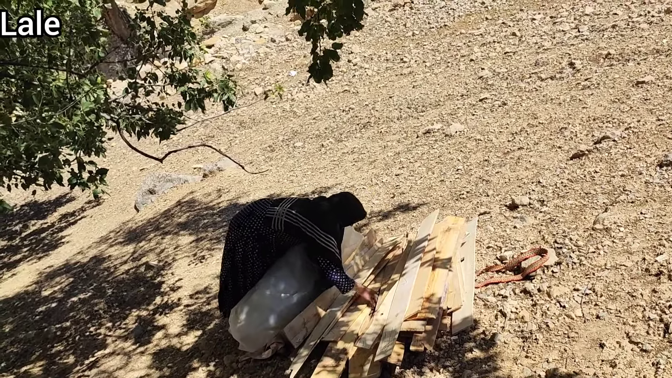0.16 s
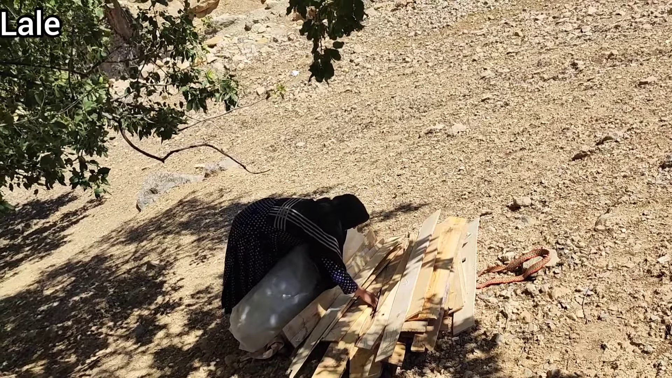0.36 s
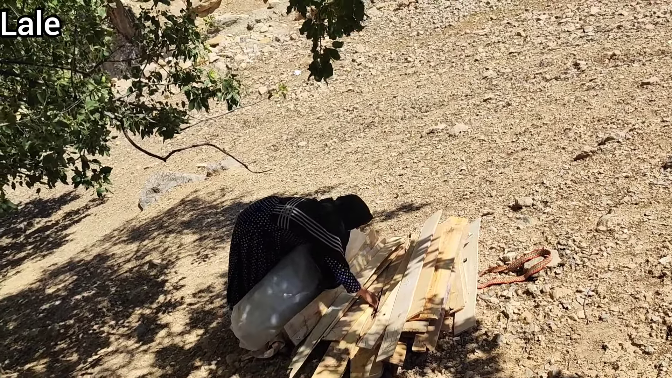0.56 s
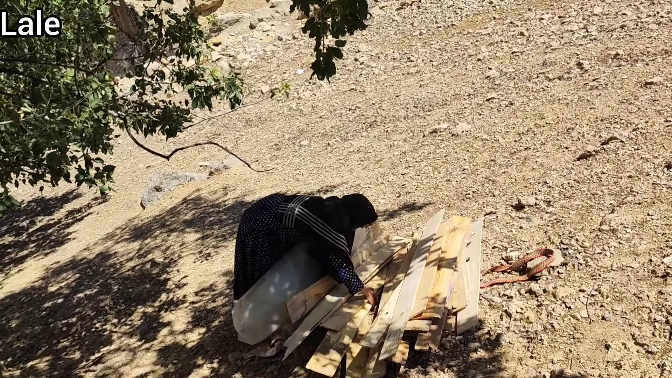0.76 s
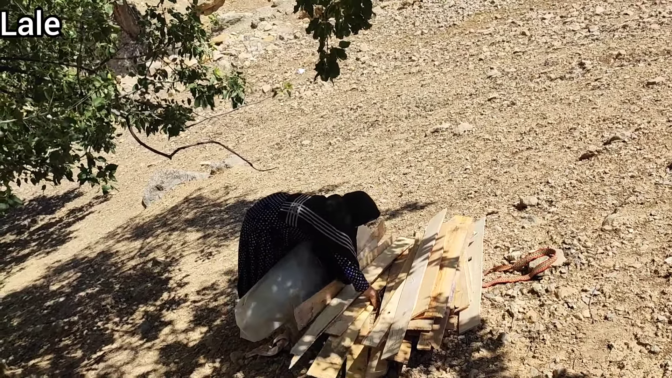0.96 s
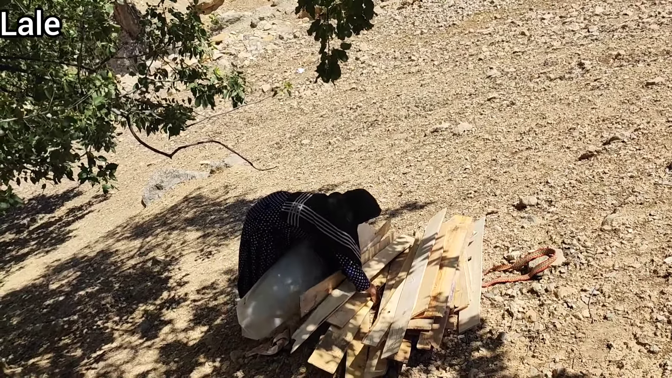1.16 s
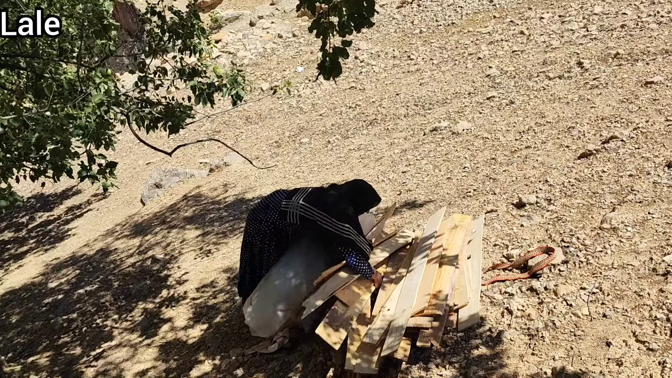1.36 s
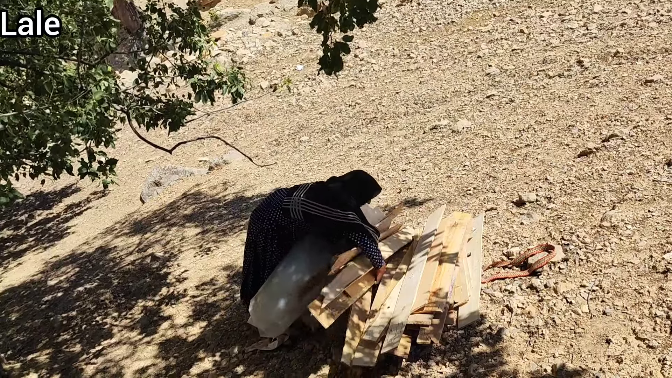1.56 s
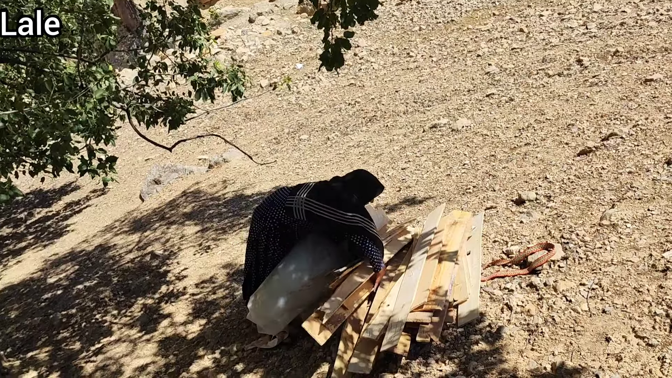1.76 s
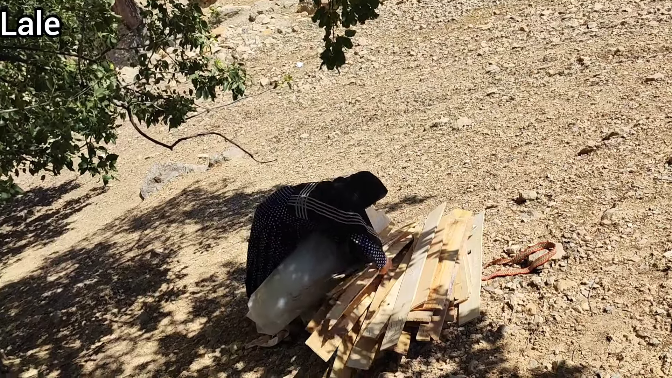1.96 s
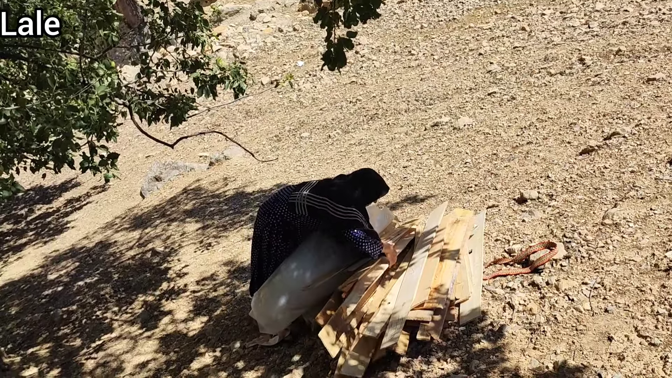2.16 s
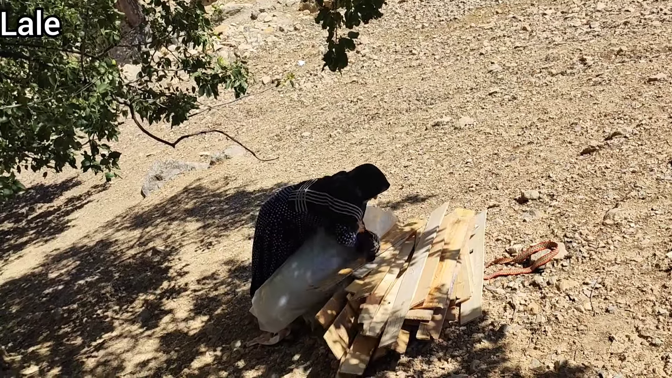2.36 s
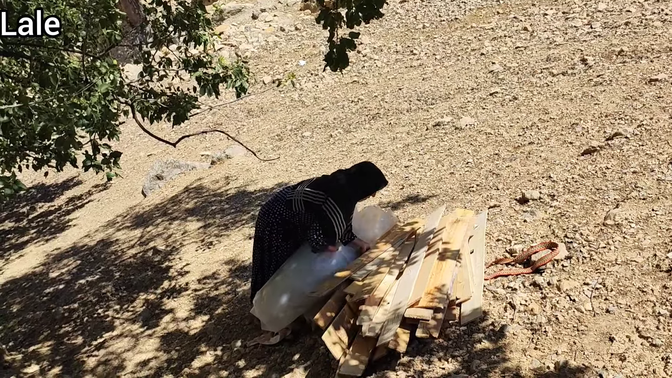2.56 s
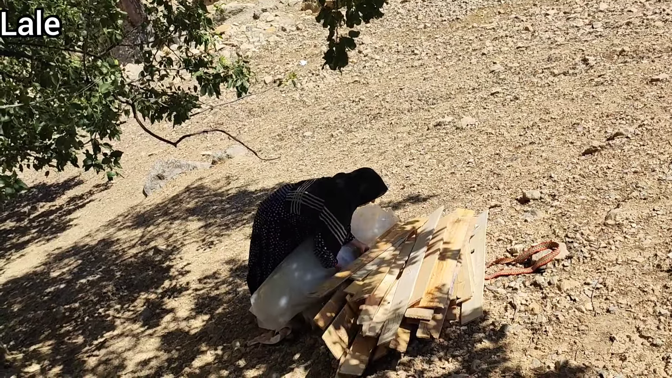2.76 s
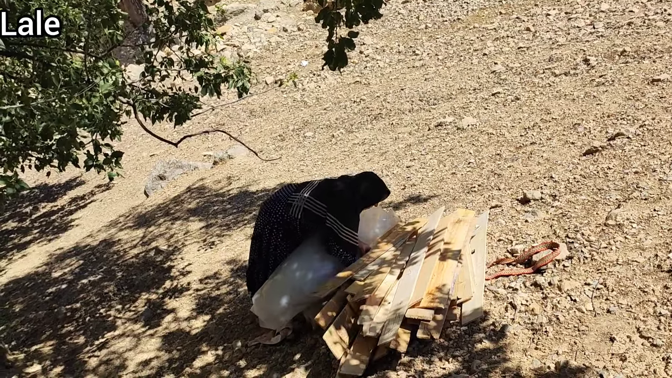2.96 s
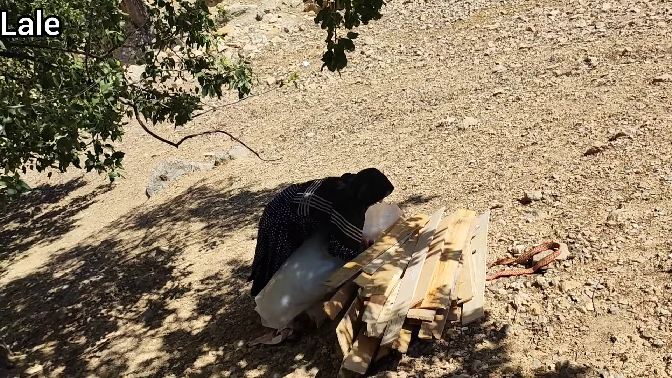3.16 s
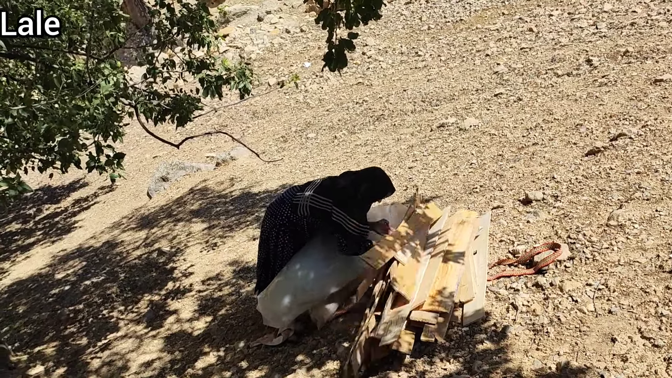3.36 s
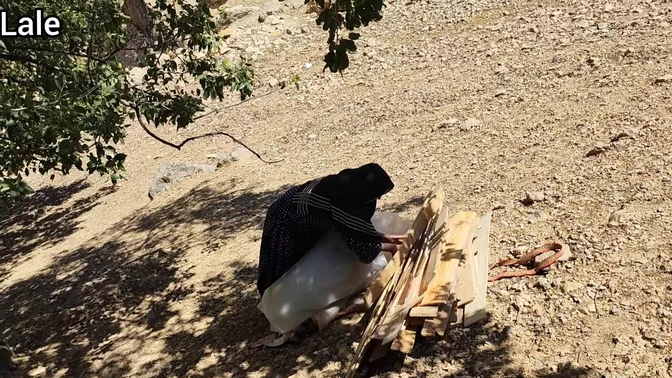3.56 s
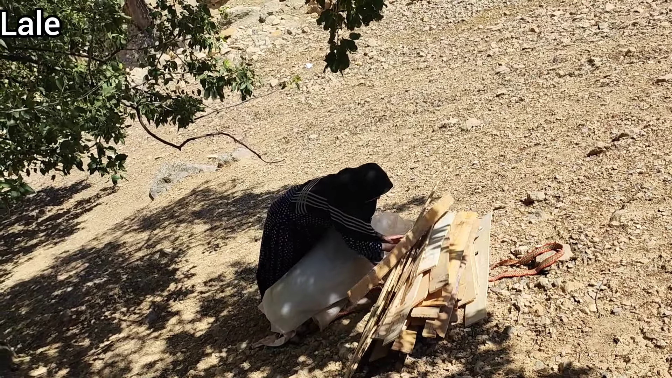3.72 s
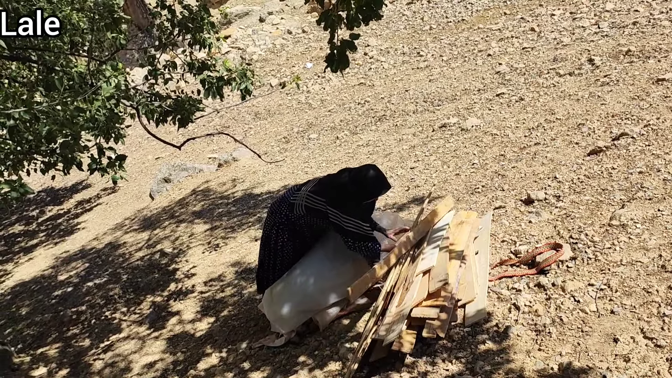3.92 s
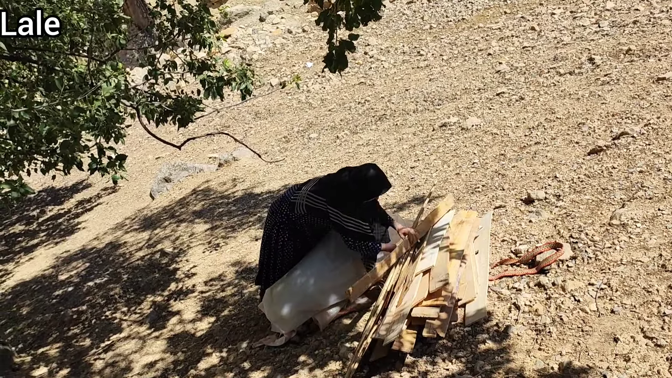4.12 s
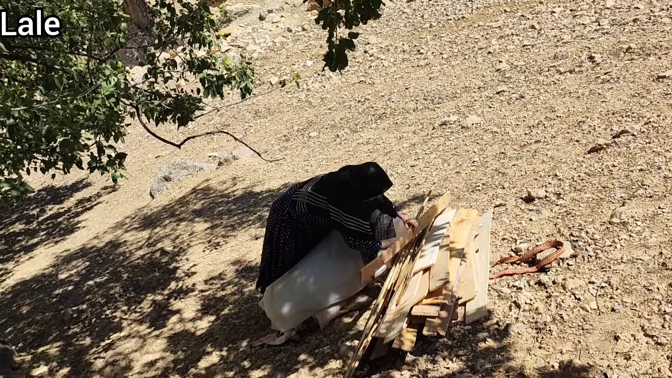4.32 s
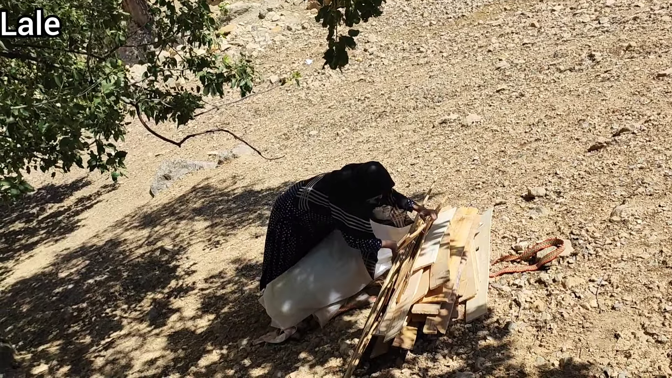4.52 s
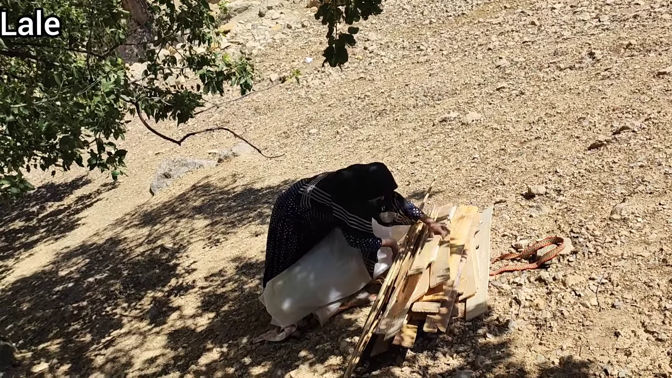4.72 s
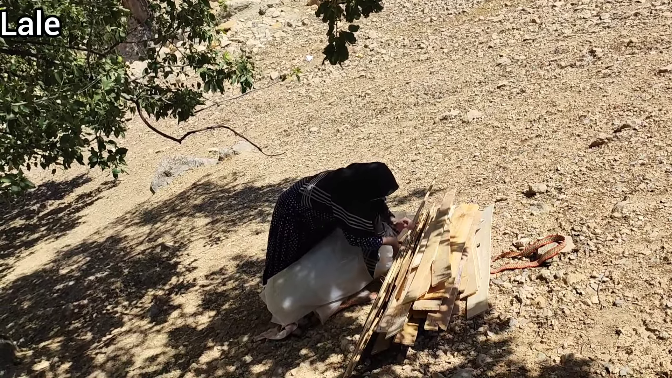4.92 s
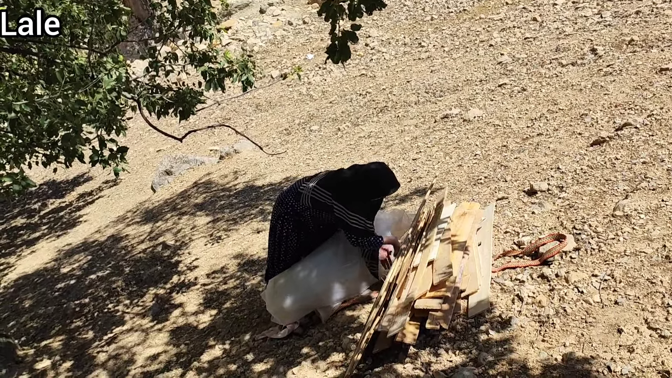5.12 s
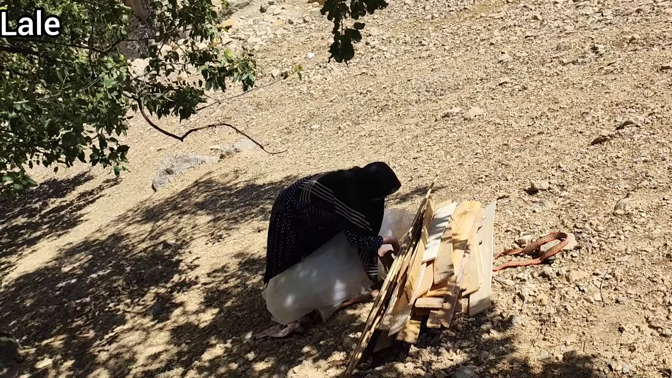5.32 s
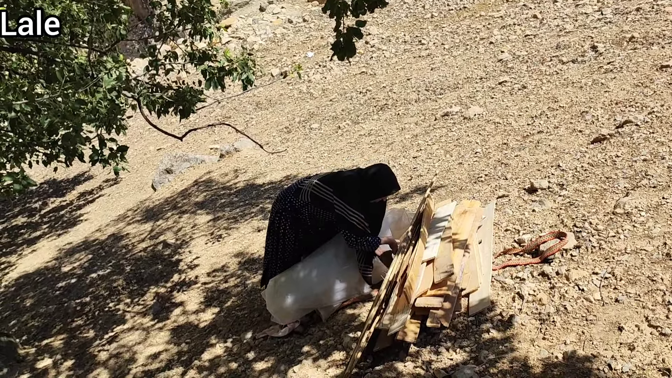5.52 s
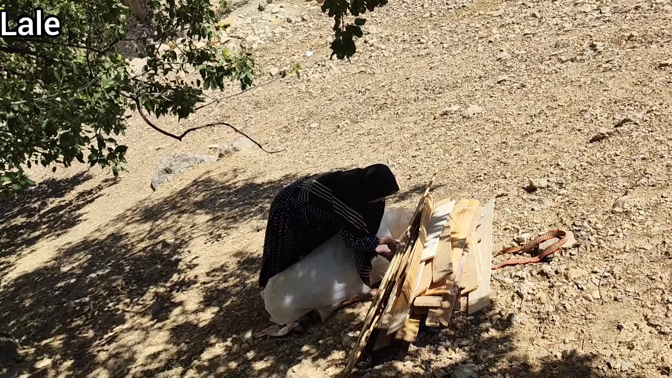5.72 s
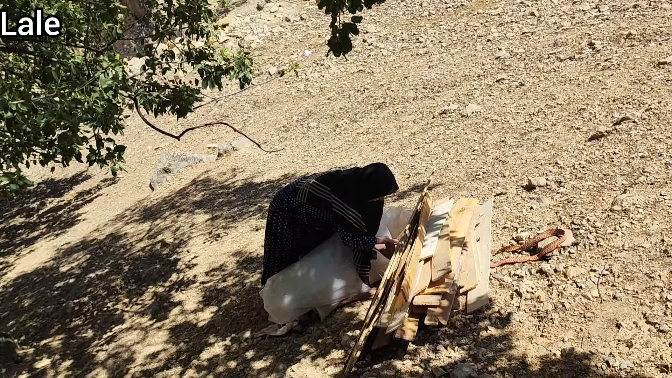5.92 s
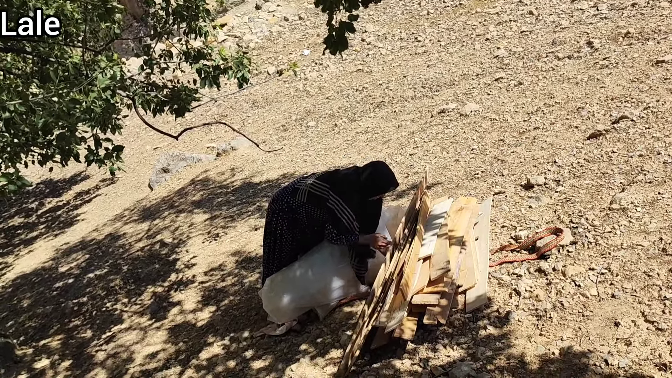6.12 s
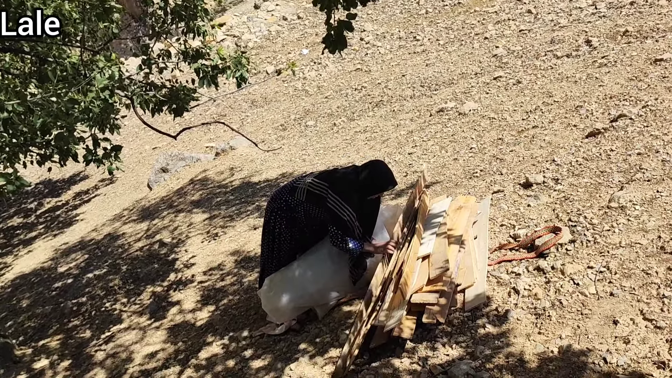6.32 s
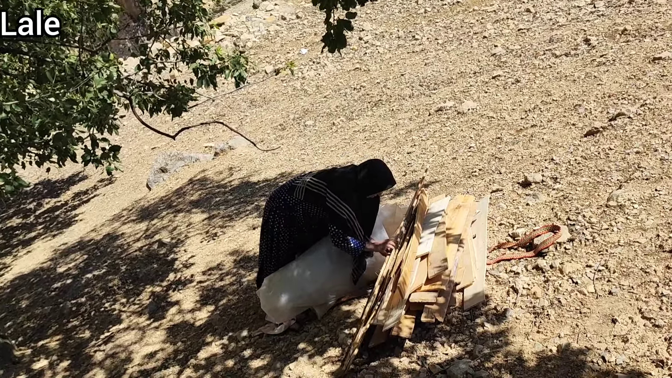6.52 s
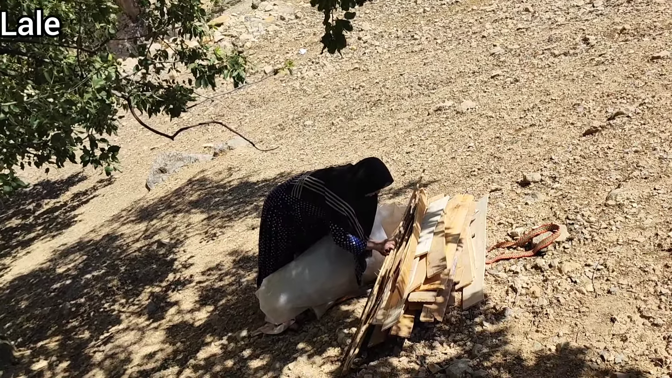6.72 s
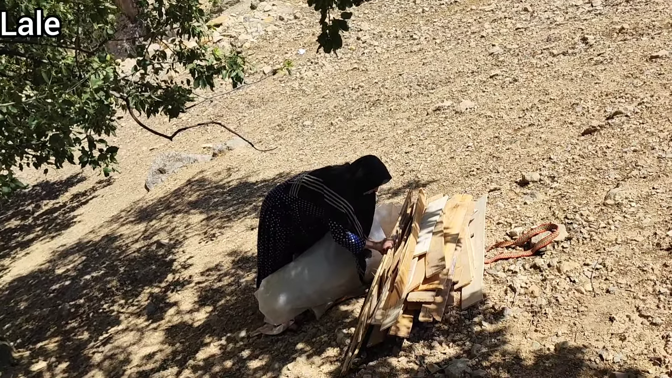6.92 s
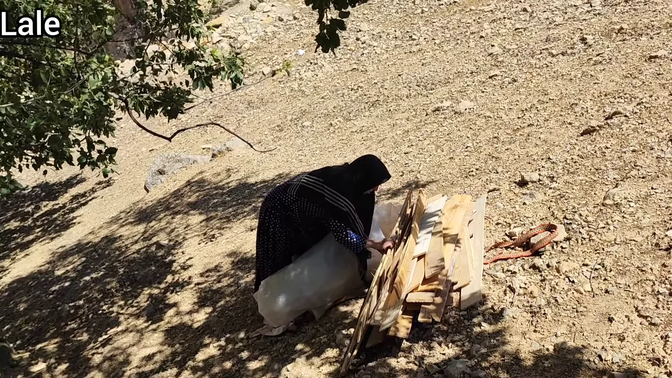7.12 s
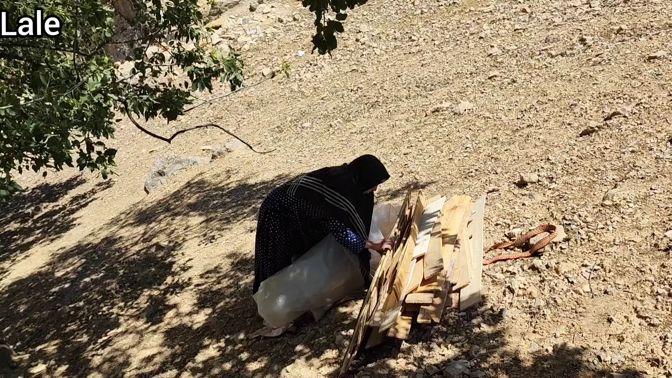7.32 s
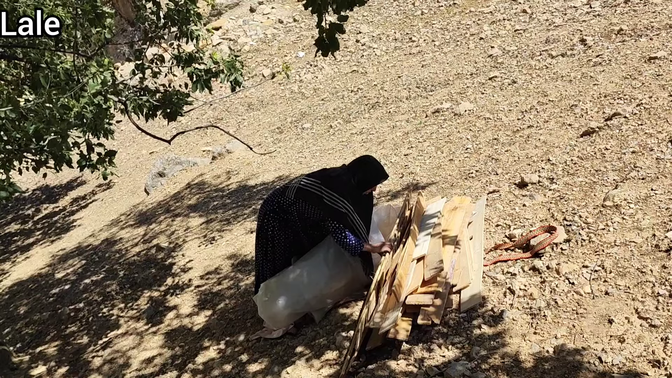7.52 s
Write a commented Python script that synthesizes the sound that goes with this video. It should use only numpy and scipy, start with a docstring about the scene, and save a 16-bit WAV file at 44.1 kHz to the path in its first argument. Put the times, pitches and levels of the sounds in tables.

```python
"""Thin wooden boards are turned over and stacked on dry ground, a few metres away in the open air.
Each impact excites the damped modes of the pile, with a crack and a short rattle; stick-slip friction
drives the same modes as the boards slide. A woven sack rustles, and splinters and strips snap.
Turbulent wind buffets the two microphone ports, chiefly the left, over a faint hush and a few high chirps.
"""
import sys
import numpy as np
from scipy import signal
from scipy.fft import rfft, irfft
from scipy.io import wavfile

SR = 44100
rng = np.random.default_rng(int(sys.argv[2]) if len(sys.argv) > 2 else 0)


def transcribe(u):
    """Save the signal u as a 16-bit wav file named by the first command-line argument.

    u: samples, shape (n,) or (channels, n), limited to [-1, 1]; the rate is SR.
    q: integer samples, one column per channel.
    """
    v = np.clip(np.atleast_2d(u).T, -1, 1)
    q = np.round(v * 32767).astype(np.int16)
    wavfile.write(sys.argv[1], SR, q)


N = 334278
TIME, FREQS = np.arange(N) / SR, np.fft.rfftfreq(N, 1 / SR)

# impacts: t/s, level/dB, f/Hz of the struck board, relative level/dB of low modes, crack, middle modes
KNOCKS = [(0.008, -30.5, 1155, -17, -26, -10), (0.083, -27.5, 963, -19, -14, -10),
          (0.129, -31, 1920, -4, -15, -5), (0.162, -33, 1785, -18, -10, -23),
          (0.246, -38, 1560, -6, -17, -11), (0.697, -41.5, 1057, -5, -19, -14),
          (0.767, -31, 1090, -17, -32, -24), (0.822, -42, 1800, 1, -3, -18),
          (0.894, -32.5, 1340, -6, -33, -10), (0.994, -45, 2460, -3, 4, -10),
          (1.012, -21.5, 1110, -9.5, -15.5, -3.5), (1.077, -32.5, 1037, -6, -8.5, -3),
          (1.14, -34.5, 1230, -10, -17, 2), (1.235, -37.5, 913, -25, -9, -25),
          (1.306, -34, 1000, -11, -15, -22), (1.438, -14, 1353, -15.5, -27, -10),
          (1.511, -34.5, 900, -2, -29, -5), (1.565, -31.5, 1037, -8, -10, -11),
          (1.603, -28.5, 986, -15, -20, -4), (1.621, -26.5, 830, -3, -18, 0),
          (1.668, -29, 1016, -32, -23, 1), (1.683, -24.5, 847, -5, -22, -9),
          (1.777, -25.5, 1274, 1.5, -27, 9), (1.83, -29.5, 2050, -13, -16, -25),
          (1.894, -32, 937, -26, -12, -18), (1.991, -25.5, 739, -11, -24, -5),
          (2.009, -29, 1260, -6, -15, -19), (2.064, -33, 2070, 3, -17, -12),
          (2.096, -29.5, 1210, -14, -23, -21), (2.192, -33.5, 1260, -1.5, -22, -17),
          (2.246, -33.5, 1037, -19, -20, -23), (2.321, -36.5, 990, -15.5, -10.5, -20),
          (2.343, -30, 1100, -3.5, -17, -26), (2.357, -18.5, 2307, -41, -30.5, -10),
          (2.368, -18, 1375, -8, -21.5, -15), (2.398, -16, 1400, -32, -17.5, -20),
          (2.432, -16, 1347, -33, -15, -11.5), (2.445, -40.5, 1040, -27, -14.5, -20),
          (2.474, -28, 1410, -16, -26.5, -19), (2.502, -20, 1243, -11, -18.5, -8.5),
          (2.606, -34, 1540, -16, -8.5, -23), (2.644, -34.5, 2330, -29, -5.5, -17),
          (2.67, -38, 1740, -28, -4, -24), (2.709, -37, 1390, -9, -8, -14),
          (3.144, -43, 2190, -26, -14, -17), (3.159, -37, 2325, -30, -14, -31),
          (3.182, -34.5, 1127, -30, -6.5, -27), (3.317, -46.5, 1390, 8, -1, -15),
          (3.363, -31, 1080, -10, -12, -14.5), (3.38, -29.5, 1920, -12, -18, -20.5),
          (3.43, -25, 656, -7, -21, -8), (3.458, -22.5, 1200, -17.5, -20, -12.5),
          (3.482, -21.5, 900, -18, -18.5, -12.5), (3.494, -10, 1700, -30.5, -14.5, -18),
          (3.515, -16, 1217, -29.5, -18, -21.5), (3.549, -18, 1240, -16.5, -26.5, -12.5),
          (3.57, -18.5, 993, -23.5, -16, -19.5), (3.589, -17, 2030, -10.5, -12.5, -20),
          (3.607, -7.5, 1355, -33.5, -14.5, -27.5), (3.62, -20.5, 900, -32, -5.5, -17),
          (3.697, -21, 960, -23, -17, -21), (3.735, -15, 1950, -29, -27.5, -12.5),
          (3.748, -16, 743, -23, -12, -14.5), (3.761, -17, 964, -23.5, -13, -22),
          (3.818, -32, 792, -30, -32, -25), (3.887, -51.5, 655, -37, -22.5, -11),
          (3.964, -36, 734, -10, -9, -11), (4.081, -32.5, 1760, -2, -35, 16),
          (4.089, -31, 1038, -29, -41, -16), (4.129, -40, 695, -2, -27, -2),
          (4.166, -47, 1300, -23, -15, -22), (4.7, -38.5, 1222, -30, -15, -20),
          (4.831, -38, 890, -25, -21.5, -18), (4.899, -37.5, 910, -8, -13.5, -15),
          (4.931, -26, 980, -34.5, -15, -28), (4.934, -22.5, 1894, -28, -17, -20),
          (4.959, -24, 978, -27, -22, -12), (4.983, -29, 1130, -20, -18, 0),
          (5.053, -43.5, 2530, -24, -0.5, -18), (5.134, -33.5, 2600, -29, -7.5, -23),
          (5.367, -38.5, 2740, -24, -8.5, -6), (5.472, -45.5, 1500, -25, -28, -24),
          (5.869, -52.5, 560, 9, -21.5, -13), (6.668, -53, 500, 11, -20, -9),
          (6.829, -49, 1850, -27, -10, -20), (7.008, -52.5, 1015, -25, -2, -17),
          (7.361, -42, 326, 11, -35, -10)]
# modes of the pile: f/Hz, level/dB, T60/s before contact damping
PILE_MODES = [(160, 7.5, 0.035), (215.6, 5.5, 0.17), (272, 4, 0.084), (312, 1.5, 0.11), (353, 1.5, 0.26),
              (415, 1, 0.085), (477, -2, 0.15), (560, -3, 0.18), (606, -3.5, 0.22), (694, 1.5, 0.13),
              (791, 0.5, 0.1), (817, -0.5, .16), (910, -5, 0.19), (992, -3.5, 0.15), (1030, -3.5, 0.31),
              (1080, -5.5, .15), (1196, -1.5, 0.12), (1303, -0.5, .15), (1370, 3, 0.05), (1500, 0, 0.062),
              (1589, -10.5, 0.057), (1725, 3, 0.071), (1830, 1, .12), (1950, -0.5, .11), (2110, -1, .11),
              (2190, -1.5, 0.17), (2277, -5, 0.3), (2440, 1.5, 0.079), (2460, -9.5, 0.15)]
LOW_MODE_HZ, MID_MODE_HZ = 450, 800  # upper limits of the low and middle modes
# spectrum of an impact's crack: f/Hz, relative level/dB
CRACK_SPECTRUM = [(1590, -14), (2700, 2.5), (5860, -9.5), (7160, -36.5), (8950, -27), (9940, -40.5),
                  (15000, -38), (16000, -42)]
# steady handling between impacts: t/s, sliding level/dB, rustle level/dB
EFFORT = [(0, -59, -54.5), (.2, -40.5, -55), (.35, -56.5, -60.5), (.55, -82, -81), (.75, -46, -50.5),
          (.95, -47, -58), (1.18, -62, -59), (1.39, -40, -49.5), (1.44, -73, -54), (1.64, -33.5, -48.5),
          (1.74, -47, -55.5), (1.95, -40, -48), (2.3, -45.5, -56.5), (2.6, -44.5, -56), (2.84, -60.5, -58),
          (2.96, -80, -77), (3.19, -50, -51), (3.36, -40.5, -46), (3.6, -26.5, -40.5), (3.8, -37, -52),
          (3.99, -53, -55), (4.05, -70.5, -66.5), (4.68, -83, -77), (4.95, -55, -57.5), (5.25, -60, -56),
          (5.5, -60, -66), (5.56, -74, -72.5), (6.45, -72, -83), (7.58, -71, -73.5)]
# a hand shifts the load: t/s, hold/s, sliding level/dB, rustle level/dB
SHOVES = [(0, 0.0074, -33.5, -51.5), (0.093, 0.015, -30, -49.5), (0.253, .01, -44, -58),
          (0.582, 0.017, -63, -66), (0.861, 0.045, -47, -54.5), (1.024, 0.032, -41, -49),
          (1.149, 0.015, -42.5, -55), (1.62, .02, -37, -48), (1.787, .02, -48, -60),
          (1.98, 0.019, -42, -51), (2.091, 0.0087, -38, -63), (2.239, 0.033, -45.5, -50.5),
          (2.466, 0.023, -45, -49), (2.62, 0.022, -59, -49), (3.196, .02, -48, -62),
          (3.372, 0.0067, -28.5, -36.5), (4.085, 0.017, -66, -59), (4.163, 0.013, -73, -56),
          (4.37, 0.018, -56, -68), (4.488, 0.033, -61, -66.5), (4.705, 0.08, -64, -64),
          (4.835, 0.011, -43, -56.5), (4.898, 0.034, -34.5, -54), (5.169, 0.021, -51, -51.5),
          (5.38, 0.04, -51.5, -60), (5.519, 0.0044, -70, -61.5), (5.574, 0.0086, -70, -65),
          (5.646, 0.023, -65.5, -70), (5.777, .005, -61.5, -62.5), (6.008, .005, -71, -87),
          (6.1, .01, -68.5, -67), (6.195, 0.035, -75, -69.5), (6.252, 0.013, -68, -66.5),
          (6.494, .01, -73, -73.5), (6.555, 0.0082, -66, -64), (6.662, .01, -61.5, -68),
          (6.776, 0.053, -76, -63.5), (6.863, 0.0089, -81, -64.5), (6.943, 0.0089, -67, -62),
          (7.021, 0.017, -70, -65), (7.149, .01, -62, -66.5), (7.374, .01, -79, -77),
          (7.557, .02, -68, -77)]
# spectrum of the sack's rustle as coloured by the microphone: f/Hz, relative level/dB
SACK_SPECTRUM = [(180, -28), (300, -6.5), (1360, -3), (1610, -8), (2500, -2), (2800, -9), (4900, -4.5),
                 (6500, -9), (7200, -18), (8700, -15.5), (9500, -18.5), (10000, -24), (15000, -29),
                 (16000, -36.5)]
# spectrum of eddies at the ports: f/Hz, relative level/dB
WIND_SPECTRUM = [(20, 1), (35, -4.5), (70, -7), (110, -8.5), (200, -27.5), (400, -55.5)]
# gusts: t/s, hold/s, level/dB
GUSTS = [(.3, .08, -58), (1.18, 0.16, -56), (1.48, 0.31, -52.5), (1.98, 0.19, -38.5), (2.24, 0.048, -39),
         (2.45, 0.076, -53), (2.87, 0.025, -51.5), (3.01, 0.012, -44.5), (3.14, 0.025, -51),
         (3.58, .02, -52.5), (4.89, .05, -63), (5.86, 0.012, -61), (6.2, 0.026, -58), (6.52, .03, -54.5),
         (6.674, .01, -55), (6.715, .03, -57), (6.81, .01, -49), (7.25, 0.024, -54)]
# spectrum of the open-air background: f/Hz, relative level/dB
HUSH_SPECTRUM = [(59, -44), (100, -17.5), (160, -3.5), (189, -12.5), (481, -23), (535, -18.5), (854, -16),
                 (1280, -24), (1830, -24), (2080, -27.5), (16000, -31.5)]
# splinters and strips breaking: t/s, level/dB, centre f/Hz
SNAPS = [(0.9994, -48, 4000), (1.147, -45, 4550), (1.1927, -33, 4200), (1.5449, -46, 3810),
         (1.952, -33.5, 5030), (2.17, -33, 4400), (2.422, -42.5, 3397), (2.614, -35, 3810),
         (2.795, -35, 3500), (3.3762, -31, 4020), (3.5748, -41, 5040), (3.7219, -37, 3830),
         (5.023, -44, 4800), (7.2554, -40.5, 2390)]
# faint high chirps: t/s, duration/s, start f/Hz, end f/Hz, level/dB
CHIRPS = [(4.672, 0.062, 8500, 8300, -75), (5.628, 0.065, 8600, 8300, -71), (5.779, 0.11, 8480, 8170, -71),
          (5.946, 0.067, 8300, 8000, -74)]
# likeness of the sound at the two ports: f/Hz, coherence (0 to 1)
COHERENCE = [(60, .96), (300, .985), (800, .975), (1300, .82), (2500, .7), (4000, .4), (6500, .1),
             (16000, .0)]
# shadowing of the ports: f/Hz, left minus right level/dB
PORT_BALANCE = [(60, -1), (110, -3), (200, -1), (380, 2), (700, 1), (1290, 2), (2380, -1), (4400, -9.5),
                (8120, -7.5), (15000, 3)]
# lead of the left port over the right: f/Hz, phase/rad
PORT_PHASE = [(300, 0), (1210, .25), (1460, .3), (1720, -1), (1980, -1.1), (2580, .5), (3700, -.5),
              (5400, 2), (16000, 2)]


def undb(db):
    """Amplitude ratio corresponding to a level in dB."""
    return 10 ** (np.asarray(db) / 20)


def along(table, hz):
    """Interpolation of a (frequency, value) table on a logarithmic frequency axis."""
    at, value = np.transpose(table)
    return np.interp(np.log(np.maximum(hz, 1)), np.log(at), value)


def unit(x):
    """Normalisation to unit RMS amplitude."""
    return x / np.sqrt(np.mean(x ** 2))


def pair(mid, side, hz):
    """Partial coherence: left and right are the weighted sum and difference of independent signals."""
    alike = along(COHERENCE, hz)
    return np.array([np.sqrt(1 + alike) * mid + sign * np.sqrt(1 - alike) * side for sign in (1, -1)])


def coloured(spectrum, gate=1.):
    """Source and filter: stereo noise is gated before it is coloured, so each grain rings out."""
    mid, side = rfft(gate * rng.standard_normal((2, N)))
    return irfft(pair(mid, side, FREQS) * undb(along(spectrum, FREQS)), N)


def decay(x, ms):
    """Exponential relaxation: each impulse dies away with the given time constant."""
    return signal.lfilter([1], [1, -np.exp(-1000 / (ms * SR))], x)


def grains(per_second, spread_db, length_ms):
    """Shot noise: the envelope of random decaying contacts, most small and a few large."""
    hits = (rng.random(N) < per_second / SR) * undb(spread_db * rng.exponential(size=N))
    return unit(decay(hits, length_ms))


def highpass(x, hz):
    """Third-order bass roll-off: little sounds below the given frequency."""
    return signal.sosfilt(signal.butter(3, hz, "high", fs=SR, output="sos"), x)


def swells(start, hold, db, rise_db_s, fall_db_s, bed_db):
    """Incoherent addition: the level in dB of events that rise, hold and fall over a bed."""
    t = TIME[::64]
    drop_db = np.maximum(rise_db_s * (start[:, None] - t), fall_db_s * (t - (start + hold)[:, None]))
    power = np.sum(undb(db[:, None] - np.maximum(drop_db, 0)) ** 2, axis=0)
    return 10 * np.log10(np.interp(TIME, t, power) + undb(bed_db) ** 2)


def board_knocks(focus_oct=.72, scatter_db=3, detune=.018, damping_db_s=600, contact_ms=.35,
                 touch_db=-20, bounce_db=-7, fade_db=-10, rattle_ms=21):
    """Impact excitation: a light touch, the hit and its rebounds ring the pile's modes and crack."""
    out, crack = np.zeros((2, N + SR)), np.zeros(N + SR)
    hz, db, t60 = np.transpose(PILE_MODES)
    t = np.arange(SR // 8) / SR
    contact = np.hanning(int(contact_ms * SR / 1000) + 3)  # wood on wood yields a little
    lead = SR // 500  # samples from first touch to hit
    mode_draws = rng.standard_normal((len(KNOCKS), 4, len(hz)))
    bounce_draws = rng.random((len(KNOCKS), 2, 14))
    for knock, (scatter, place, side, mistune), (when, size) in zip(KNOCKS, mode_draws, bounce_draws):
        s, peak_db, ring_hz, low_db, crack_db, mid_db = knock
        near = np.exp(-(np.log2(hz / ring_hz) / focus_oct) ** 2)
        own = near == near.max()  # the struck board's own mode
        lift_db = np.select([hz < LOW_MODE_HZ, hz < MID_MODE_HZ], [low_db + 8, mid_db + 6], 8 * near)
        weight = undb(db + scatter_db * scatter + lift_db + 5 * own)
        pitch = np.where(own, ring_hz, hz * (1 + detune * mistune))
        # the point of impact sets the sign of each mode
        port_gains = pair(np.sign(place + 9 * own), side, hz) * weight
        modes = np.exp(np.outer(2j * np.pi * pitch - np.log(1000) / t60, t)).imag
        # neighbouring boards damp the ring, least that of the struck one
        modes *= undb(-damping_db_s * np.outer(1 - .69 * own, t))
        force = np.zeros(SR // 10)
        force[[0, lead // 2, lead]] = undb(touch_db), undb(touch_db / 2), 1
        rebounds = lead + (rattle_ms * when * SR / 1000).astype(int)
        np.add.at(force, rebounds, undb(bounce_db + fade_db * when) * (2 * size - 1))
        ring = signal.fftconvolve(port_gains @ modes, np.convolve(force, contact)[None], axes=1)
        start = int(s * SR) - lead
        out[:, start:start + ring.shape[1]] += ring * undb(peak_db) / np.abs(ring.mean(axis=0)).max()
        crack[start:start + len(force)] += np.abs(force) * undb(peak_db + crack_db)
    cracks = coloured(CRACK_SPECTRUM, gate=decay(crack[:N], ms=4))
    return highpass(out[:, :N], hz=152) + undb(1.5) * highpass(cracks, hz=1500)


def handling(shove_rise_db_s=447, shove_fall_db_s=281.5, drag_rise_db_s=2499, drag_fall_db_s=318.5):
    """Power summation: effort, shoves and the drag of struck boards set the sliding and rustle levels."""
    s, slide_db, rustle_db = np.transpose(EFFORT)
    start, hold, boards_db, sack_db = np.transpose(SHOVES)
    blow, peak_db, _, _, crack_db, _ = np.transpose(KNOCKS)
    # a shove within 8 ms of a blow sets in as sharply as the drag
    struck = np.abs(start[:, None] - blow).min(axis=1, keepdims=True) < .008
    rise = np.where(struck, drag_rise_db_s, shove_rise_db_s)
    levels = []
    for steady_db, shove_db, drag_db in ((slide_db, boards_db, peak_db - 12.5),
                                         (rustle_db, sack_db, peak_db + crack_db - 10)):
        shoved_db = swells(start, hold, shove_db, rise, shove_fall_db_s, np.interp(TIME, s, steady_db))
        levels.append(swells(blow, 0, drag_db, drag_rise_db_s, drag_fall_db_s, shoved_db))
    return levels


def board_sliding(slide_db, damping=1.64, drift_db=5):
    """Stick-slip friction: dense contacts drive the pile's modes, damped by the boards that touch."""
    out = 0
    low_db = -3 - .3 * (slide_db + 43)  # harder scraping is brighter: the low modes grow less
    contacts = grains(700, spread_db=3, length_ms=.91) * undb(slide_db)
    for hz, db, t60 in PILE_MODES:
        pole = np.exp((2j * np.pi * hz - damping * np.log(1000) / t60) / SR)
        drift = np.interp(TIME, np.arange(100) / 12, rng.standard_normal(100))  # the mode comes and goes
        mid, side = signal.lfilter([1], [1, -pole], contacts * rng.standard_normal((2, N))).imag
        gain = np.sqrt(1 - abs(pole)) * undb(db + low_db * (hz < LOW_MODE_HZ) + drift_db * drift)
        out = out + pair(mid, side, hz) * gain
    return highpass(out, hz=108) * undb(-17)


def sack_rustle(rustle_db, flutter_db=2):
    """Friction noise: woven strips rub in fine grains over a hiss that flutters as folds give way."""
    flutter = np.interp(TIME, np.arange(200) / 25, rng.standard_normal(200))
    gate = (.81 + .37 * grains(1000, spread_db=4.5, length_ms=4)) * undb(flutter_db * flutter)
    rub = highpass(unit(coloured(SACK_SPECTRUM, gate)), hz=200)
    sheen = highpass(rub, hz=9000)
    sheen_gain = undb(-.2 * (rustle_db + 56.5))  # falls as the rubbing grows harder
    return (rub - sheen + sheen * sheen_gain) * undb(rustle_db + 2)


def wind(right_db=-8.5):
    """Turbulent pressure: eddies rumble independently at each port, in gusts over a breeze."""
    eddies = rng.standard_normal((2, N)) * (.8 + .4 * grains(60, spread_db=3.5, length_ms=8.8))
    rumble = unit(irfft(rfft(eddies) * undb(along(WIND_SPECTRUM, FREQS)) * (FREQS > 15), N))
    level_db = swells(*np.transpose(GUSTS), rise_db_s=400.5, fall_db_s=249, bed_db=-63)
    return rumble * undb(level_db + np.array([[0], [right_db]]))


def hush():
    """Stationary noise: the faint broadband background of the open air."""
    return unit(coloured([(40, -30.5)] + HUSH_SPECTRUM)) * undb(-71)


def snaps(decay_cycles=6):
    """Brittle fracture: a splinter or strip releases a few cycles of noise in a two-octave band."""
    out, t = np.zeros((2, N + SR)), np.arange(SR // 100) / SR
    for s, peak_db, centre_hz in SNAPS:
        burst = rng.standard_normal((2, len(t))) * np.exp(-t * centre_hz / decay_cycles)
        band = signal.butter(2, [centre_hz / 2, 2 * centre_hz], "band", fs=SR, output="sos")
        snap = signal.sosfilt(band, burst)
        start = int(s * SR)
        out[:, start:start + len(t)] += snap * undb(peak_db) / np.abs(snap).max()
    return out[:, :N]


def chirps(width_hz=300):
    """Amplitude modulation: low-pass noise broadens short, slightly falling tones into breathy chirps."""
    tones = np.zeros(N)
    wobble = unit(decay(rng.standard_normal(N), ms=1000 / (2 * np.pi * width_hz)))
    for s, length, start_hz, end_hz, db in CHIRPS:
        progress = np.clip((TIME - s) / length, 0, 1)
        phase = 2 * np.pi * np.cumsum(start_hz + (end_hz - start_hz) * progress) / SR
        tones += undb(db) * np.sqrt(np.sin(np.pi * progress)) * np.sin(phase)
    return tones * wobble


def scene():
    """Linear superposition: the pressures of all sources add at each port."""
    slide_db, rustle_db = handling()
    return (hush() + board_knocks() + snaps() + chirps()
            + board_sliding(slide_db) + sack_rustle(rustle_db) + wind())


def record(dry, cutoff_hz=15800):
    """Acoustic shadowing: the left port loses treble and shifts in phase; both ports are low-passed."""
    half = undb(along(PORT_BALANCE, FREQS) / 2) * np.exp(.5j * along(PORT_PHASE, FREQS))
    heard = irfft(rfft(dry) * [half, 1 / half], N)
    return signal.sosfilt(signal.ellip(10, .2, 80, cutoff_hz, fs=SR, output="sos"), heard)


dry = scene()
out = record(dry)
transcribe(out)
```